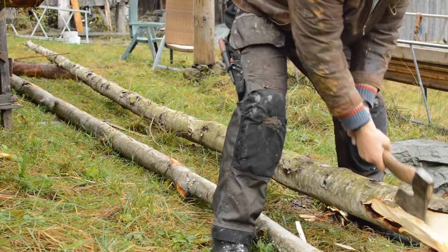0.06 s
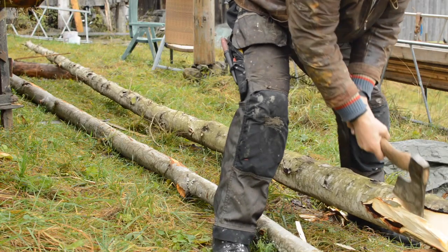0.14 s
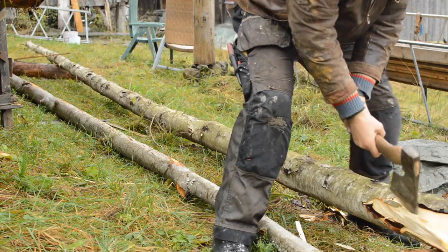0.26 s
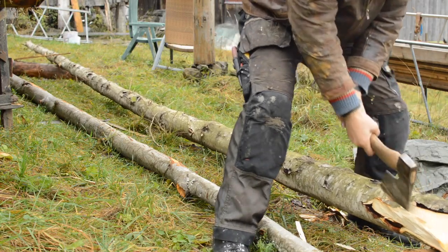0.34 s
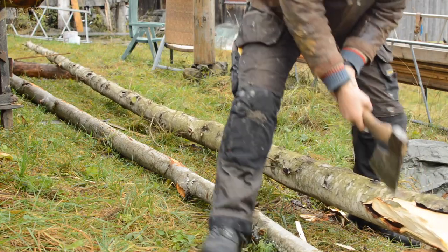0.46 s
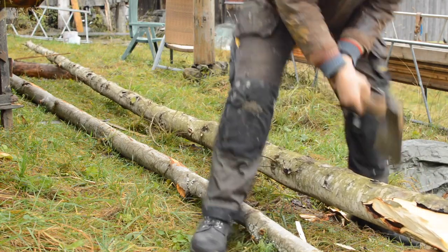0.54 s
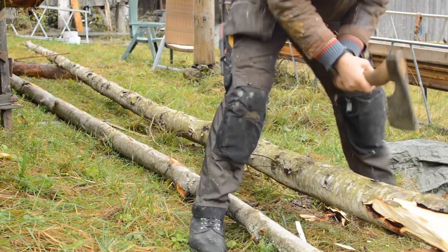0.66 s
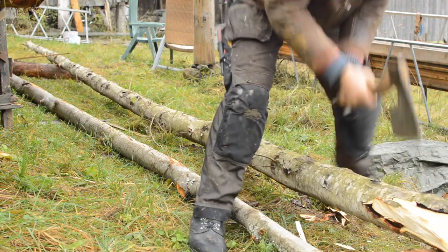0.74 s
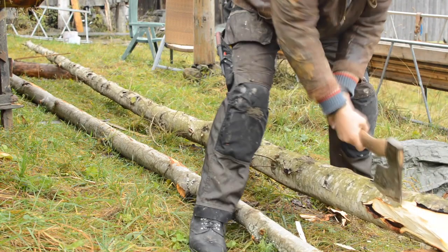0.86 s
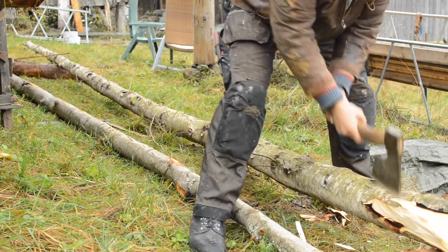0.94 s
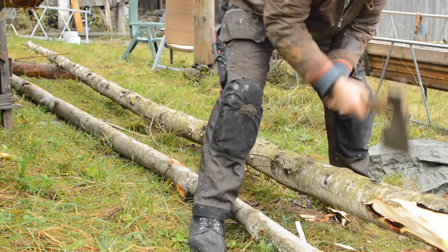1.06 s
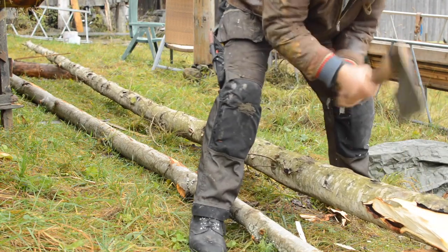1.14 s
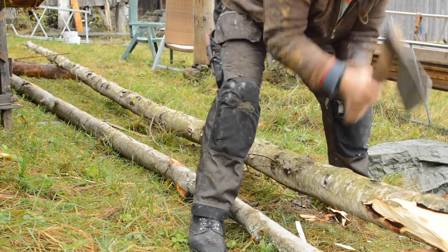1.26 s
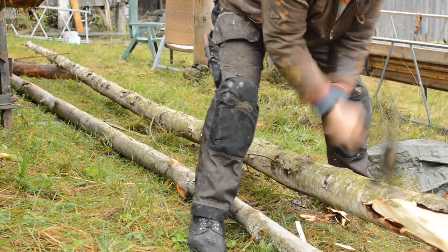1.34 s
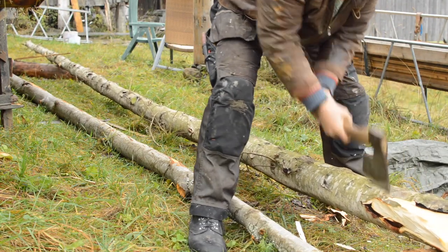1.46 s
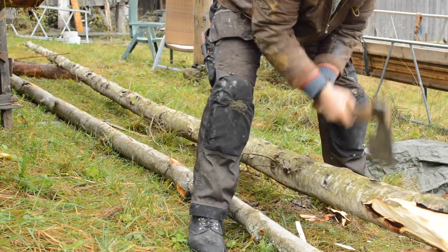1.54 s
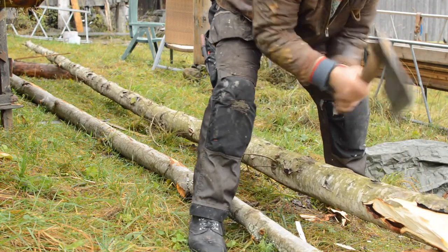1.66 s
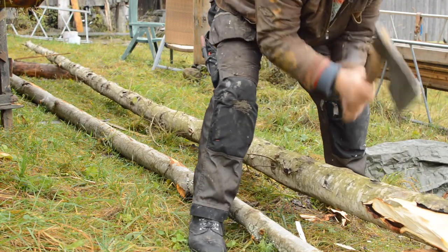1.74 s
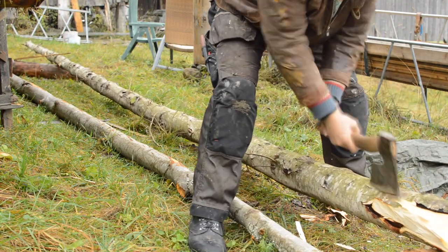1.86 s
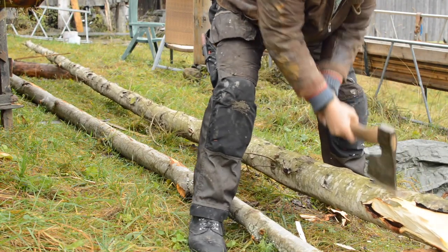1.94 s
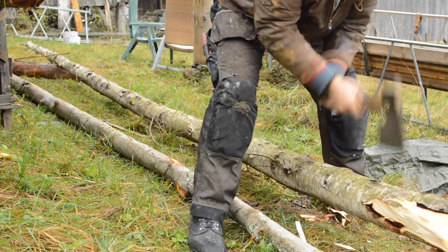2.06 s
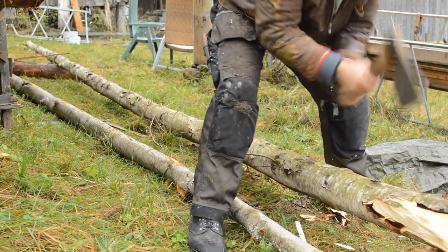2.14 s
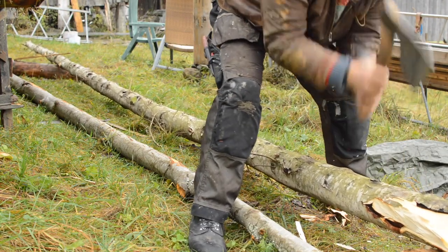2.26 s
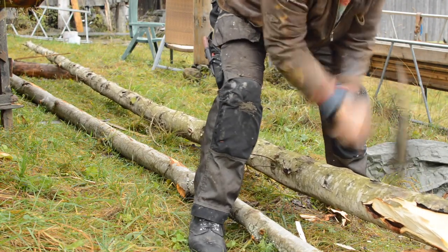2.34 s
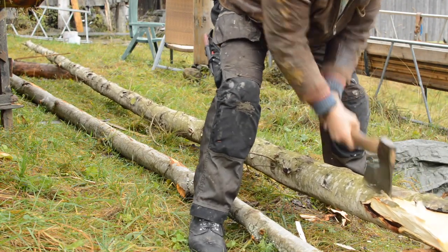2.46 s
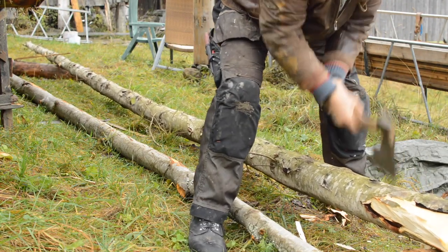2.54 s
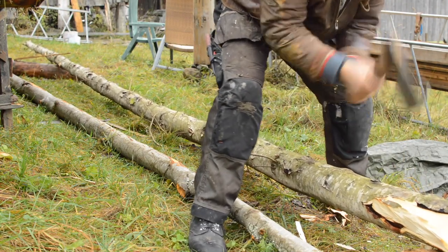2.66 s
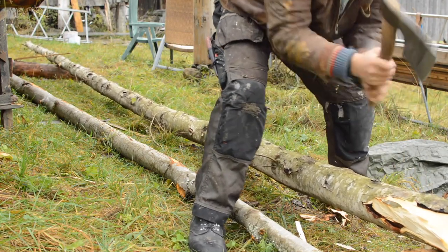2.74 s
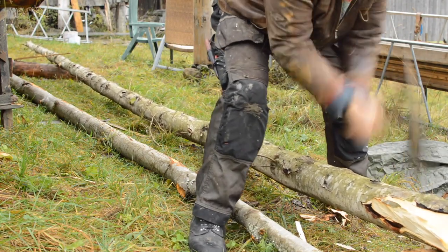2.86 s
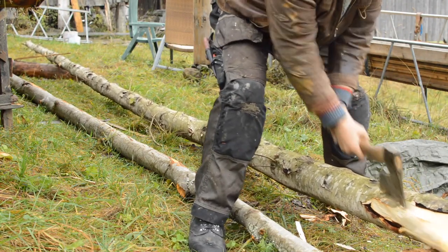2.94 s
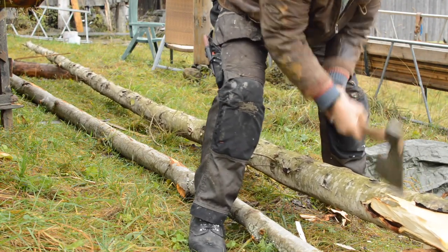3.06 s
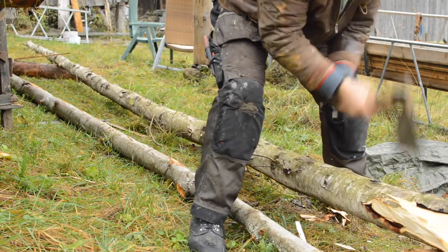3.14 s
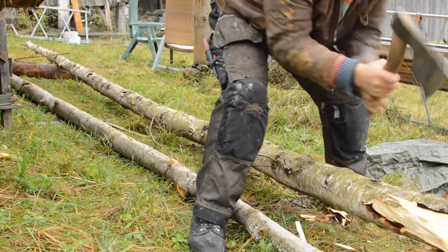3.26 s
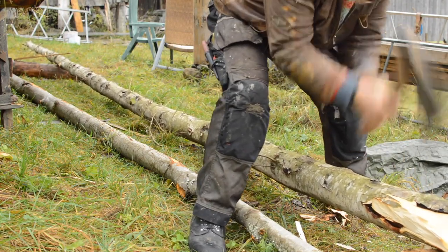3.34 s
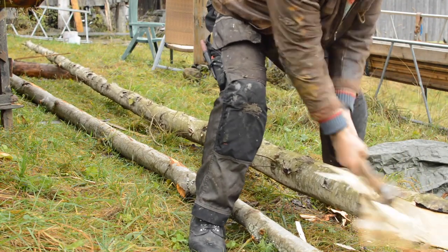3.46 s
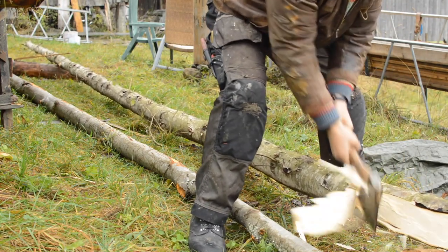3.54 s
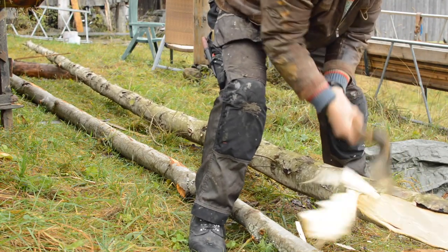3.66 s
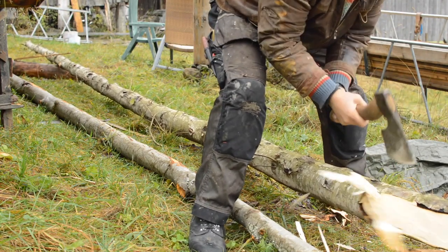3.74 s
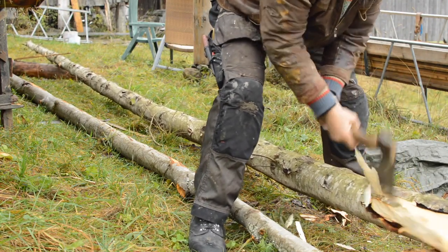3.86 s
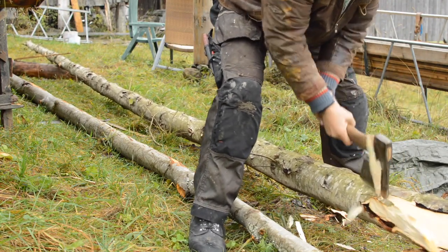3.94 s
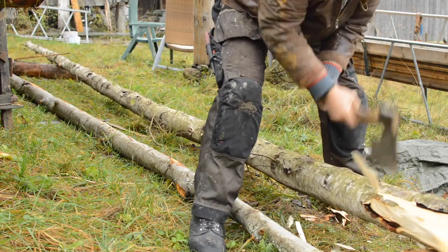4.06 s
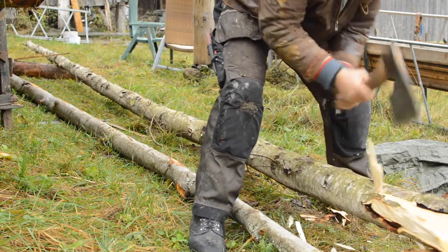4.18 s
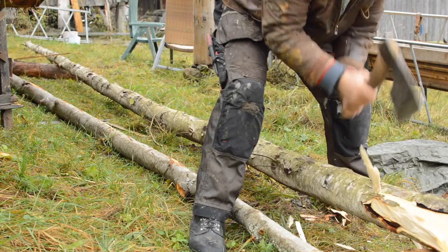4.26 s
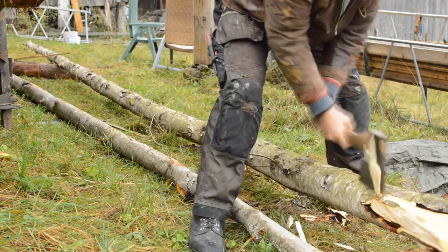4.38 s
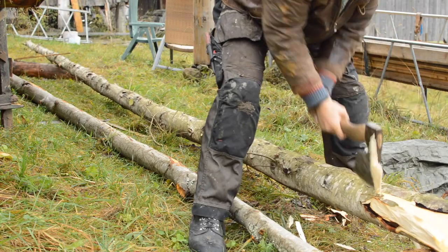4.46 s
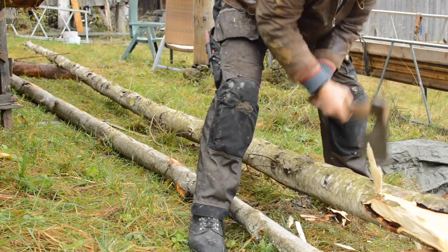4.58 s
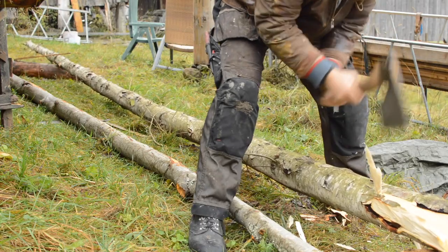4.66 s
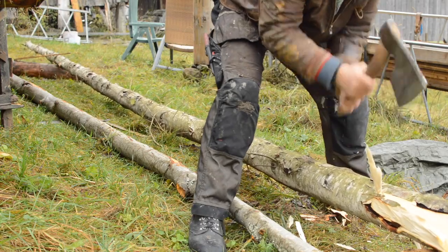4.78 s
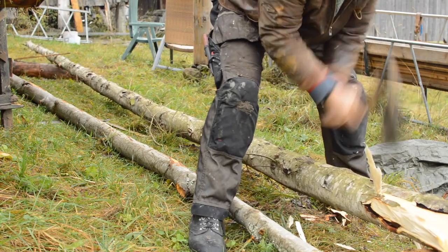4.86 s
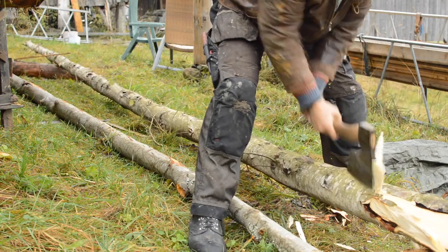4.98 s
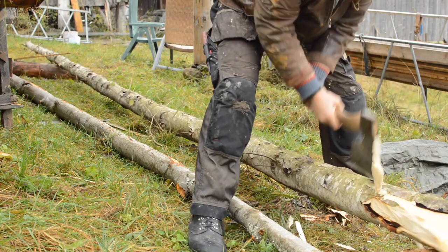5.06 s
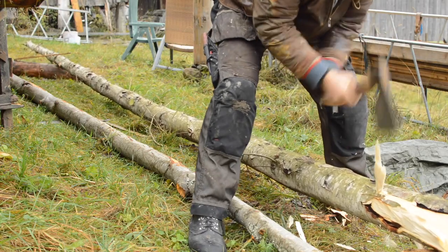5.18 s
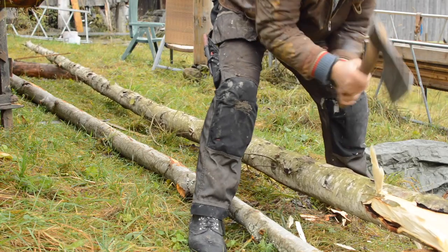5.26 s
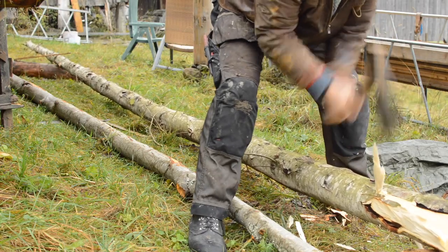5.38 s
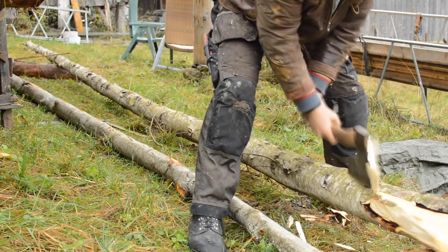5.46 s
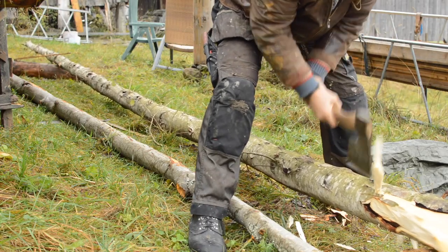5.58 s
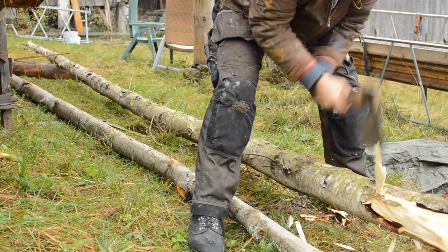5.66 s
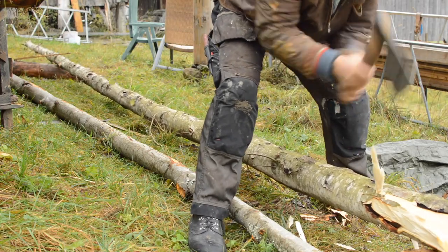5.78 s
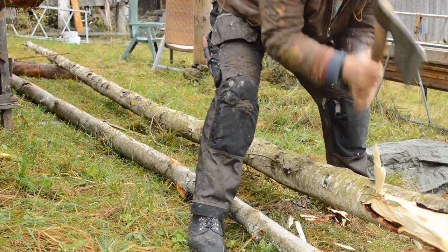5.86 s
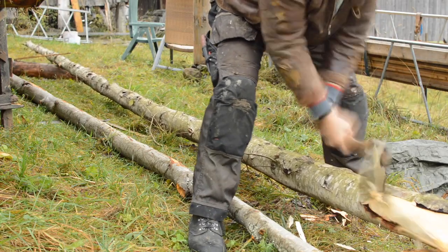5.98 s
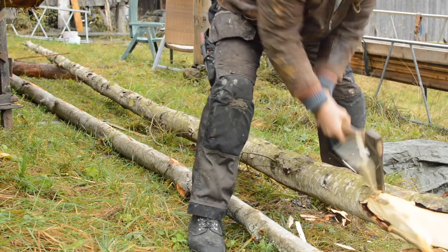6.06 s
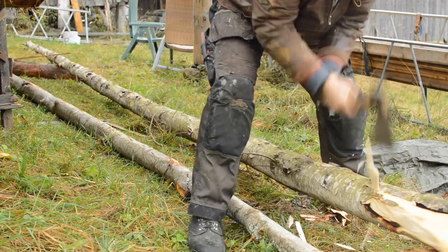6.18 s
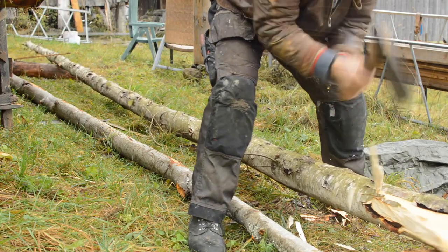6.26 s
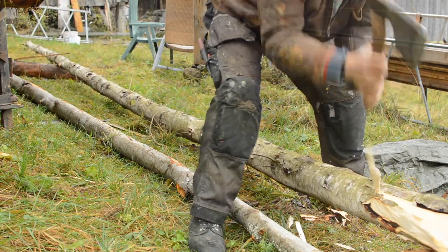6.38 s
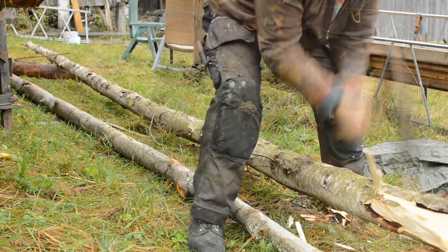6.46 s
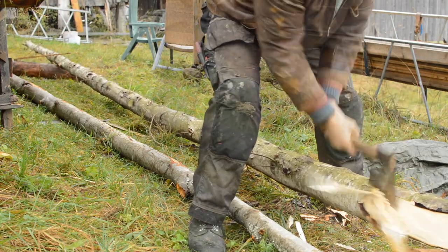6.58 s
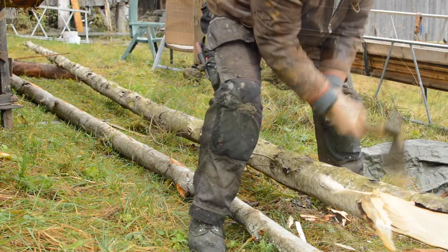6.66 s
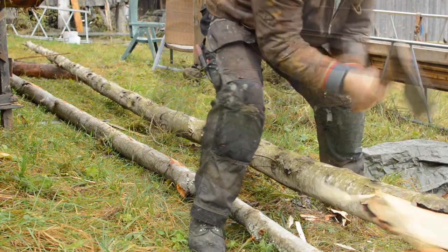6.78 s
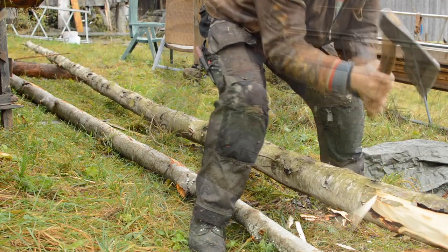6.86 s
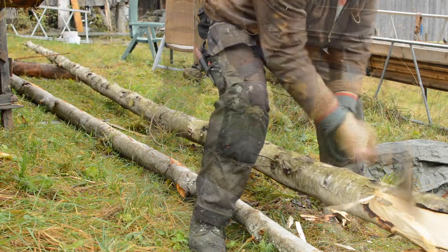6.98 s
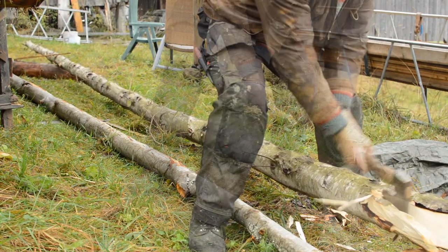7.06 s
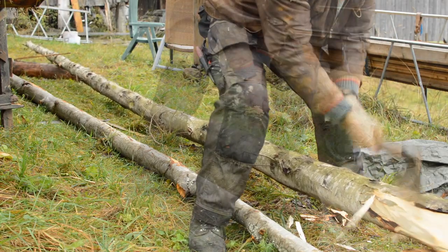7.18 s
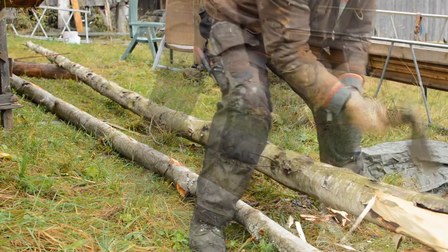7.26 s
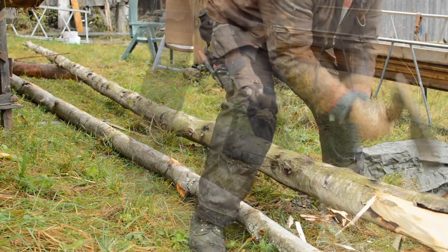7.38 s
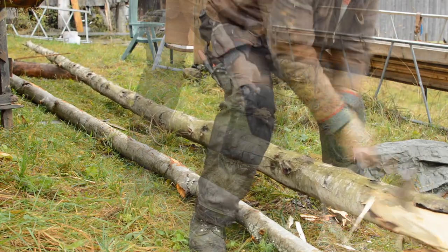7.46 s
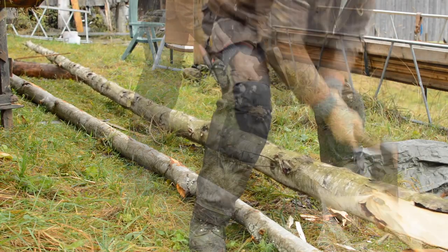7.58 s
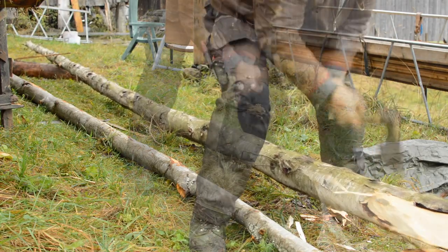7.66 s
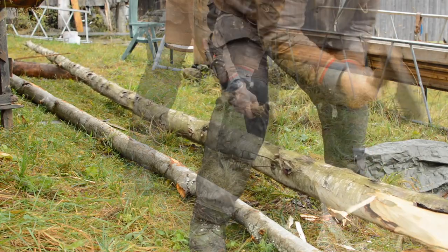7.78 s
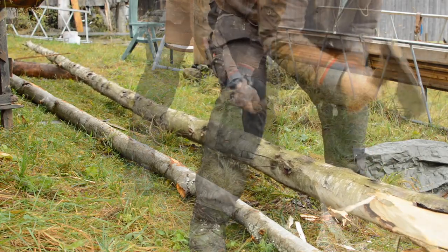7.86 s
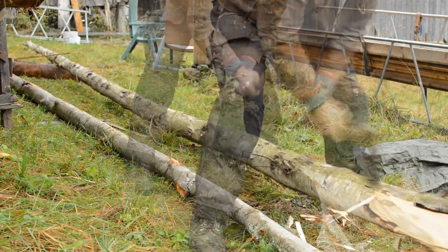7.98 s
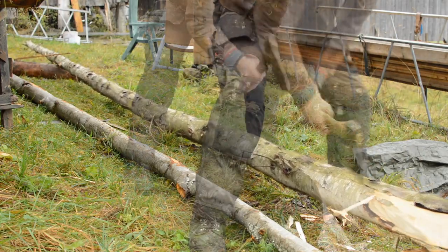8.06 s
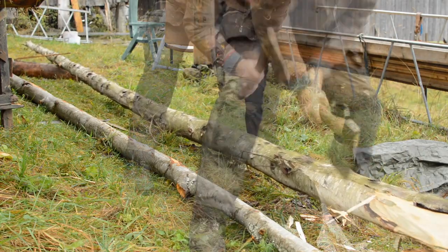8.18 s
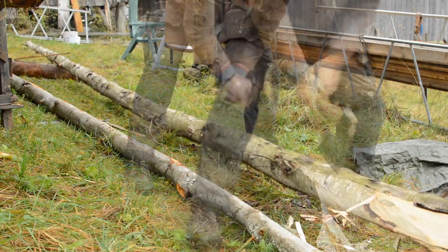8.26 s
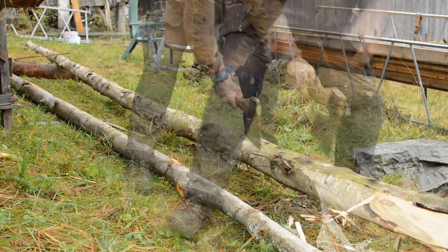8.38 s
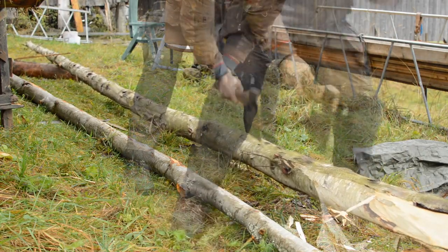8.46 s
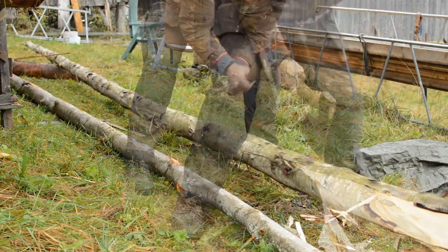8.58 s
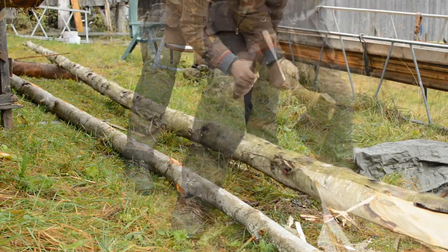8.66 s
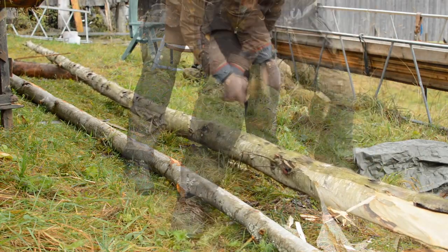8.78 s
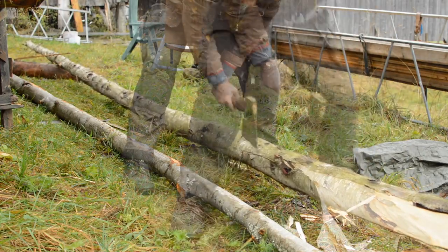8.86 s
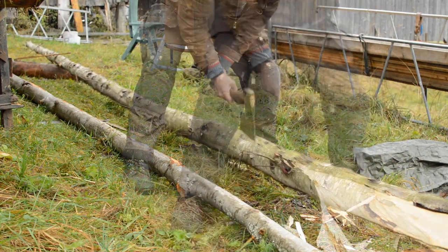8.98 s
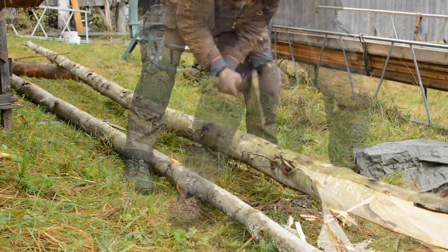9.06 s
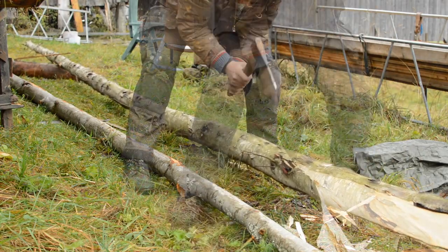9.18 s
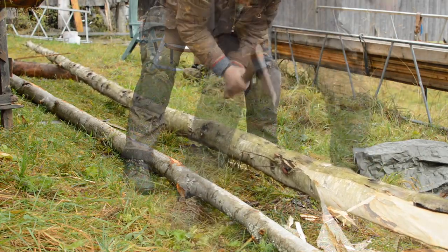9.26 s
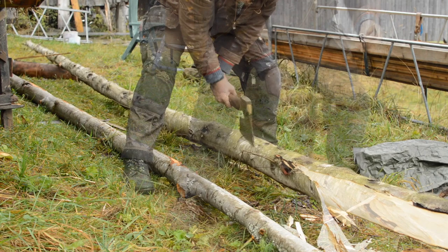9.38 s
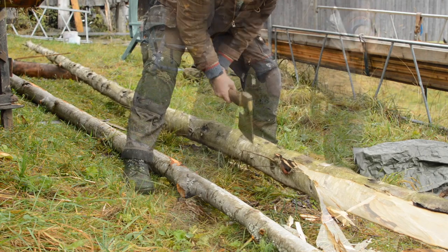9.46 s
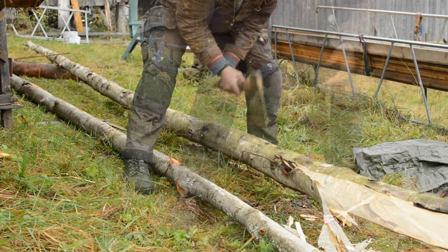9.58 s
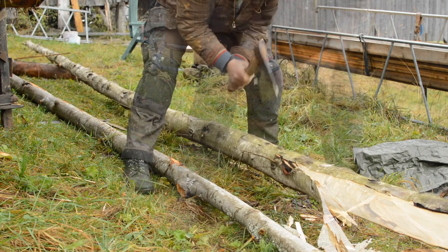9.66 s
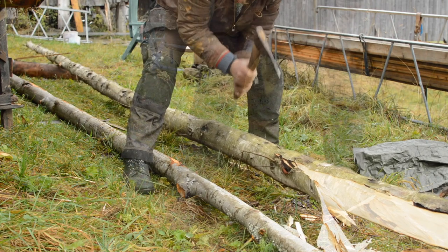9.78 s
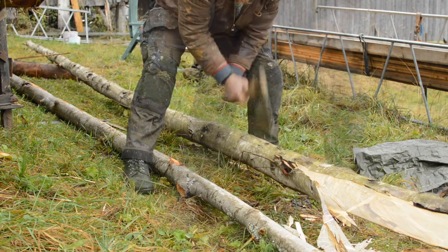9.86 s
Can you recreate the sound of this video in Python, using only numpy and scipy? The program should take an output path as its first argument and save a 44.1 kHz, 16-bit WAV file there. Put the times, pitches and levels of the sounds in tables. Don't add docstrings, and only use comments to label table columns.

```python
import sys
import numpy as np
from scipy import signal
from scipy.fft import rfft, irfft, next_fast_len
from scipy.io import wavfile
from scipy.ndimage import uniform_filter1d, map_coordinates

SR = 44100
rng = np.random.default_rng(int(sys.argv[2]) if len(sys.argv) > 2 else 0)


def store_pcm(level_fs):
    pcm = np.round(np.clip(level_fs, -1, 1) * 32767).astype(np.int16)
    wavfile.write(sys.argv[1], SR, np.atleast_2d(pcm).T)


def how_loud(loudness_db):
    steps = np.asarray(loudness_db, float) / 20
    return 10 ** steps


N = 437472

# (first contact [s], level [dB], split resonance [Hz], time until the chip parts [s],
# fibre hiss [dB])
BITES = [(0.9111, -12, 1410, 0.015, -10.5), (1.4209, -1.5, 1418, .0145, -12.5),
         (1.908, 3.5, 1484, .013, -16.5), (2.428, -0.5, 1290, .028, -8.5), (2.9596, 5.5, 1395, .0155, -16),
         (3.472, 4.5, 1498, 0.024, -12.5), (3.95, -10, 1391, 0.016, -10), (4.432, -3, 1305, .016, -11),
         (4.972, -3.5, 1349, .019, -8), (5.501, -1, 1414, .015, -14), (6.039, 2, 1481, .019, -11.5),
         (6.567, 6.5, 1497, .021, -14), (7.074, 2.5, 1205, 0.016, -11), (7.546, -9, 2136, .011, -10),
         (8.038, -12.5, 1315, .015, -5)]


def unit(x):
    return x / np.sqrt(np.mean(x ** 2) + 1e-20)


def along(points, hz):
    f, v = np.transpose(points)
    return np.interp(np.log(hz + 1), np.log(f + 1), v)


def curves(rows):
    s, *cols = np.transpose(rows)
    return [np.interp(np.arange(N) / SR, s, c) for c in cols]


def wobble(rate, size=N):
    knots = rng.standard_normal(int(size * rate / SR) + 4)
    return map_coordinates(knots, [np.arange(size) * rate / SR])


def bump(middle_s, spread_s):
    return np.exp(-((np.arange(N) / SR - middle_s) / spread_s) ** 2)


def filtered(x, response):
    m = next_fast_len(x.shape[-1] + 4096)
    spectrum = rfft(x, m) * response(np.fft.rfftfreq(m, 1 / SR))
    return irfft(spectrum, m)[..., :x.shape[-1]]


def resonance(centre_hz, width_hz):
    return lambda f: 1j * f * width_hz / (centre_hz ** 2 - f * f + 1j * f * width_hz)


def add(track, s, sound):
    part = track[max(round(s * SR), 0):][:len(sound)]
    part += sound[:len(part)]


def rush(spectrum, patchy_db):
    z = signal.stft(rng.standard_normal(N), nperseg=512)[2]
    field = uniform_filter1d(rng.standard_normal(z.shape), 6, 0)
    field = uniform_filter1d(field, 14, 1)
    noise = signal.istft(z * how_loud(patchy_db * unit(field)), nperseg=512)[1][:N]
    return unit(filtered(noise, lambda hz: how_loud(along(spectrum, hz))))


def engine():
    # (time [s], frequency [Hz], level [dB])
    firing = [(0.0, 94.84, -53), (0.77, 94.8, -48), (2.73, 94.87, -50.5), (2.96, 94.06, -46.5),
              (5.63, 91.84, -52), (7.4, 94.26, -48), (8.51, 94.9, -60), (8.84, 99, -54.5),
              (9.09, 98.3, -58), (9.28, 92.8, -54.5), (9.75, 90, -64), (9.92, 93.8, -55)]
    # (multiple of firing tone [1], level [dB], phase wander [rad])
    overtones = [(2.0, -17.5, 1.2), (2.45, -13.5, 2.4)]
    hum_hz, hum_db = curves(firing)
    turn = 2 * np.pi * np.cumsum(hum_hz) / SR
    sides = sum(how_loud(db + 1.5 * wobble(6)) * np.sin(k * turn + wander * wobble(6))
                for k, db, wander in overtones)
    return how_loud(hum_db + 4.0) * (how_loud(1.3 * wobble(13)) * np.sin(turn) + sides)


def whine():
    # (time [s], frequency [Hz], level [dB])
    drift = [(.1, 776.2, -66), (.62, 775.2, -53), (1.5, 772, -52.5), (1.8, 777, -69), (2.5, 780, -57.5),
             (2.95, 781, -52), (3.2, 778.3, -67.5), (4.2, 784.5, -53), (4.55, 800, -82), (4.7, 808, -55.5),
             (5.0, 810, -52.5), (5.5, 804.3, -84.5), (6.0, 787.7, -54.5), (6.8, 797, -57), (7.1, 800, -68),
             (7.3, 810, -51.5), (8.8, 810, -59.5), (9.92, 816, -73)]
    hz, db = curves(drift)
    return how_loud(db + 1 + 1.6 * wobble(20)) * np.sin(2 * np.pi * np.cumsum(hz) / SR)


def mains():
    # (frequency [Hz], level [dB rms], phase wander [rad])
    tones = [(61, -57, .3), (119.6, -64, 1.2)]
    turn = 2 * np.pi * np.arange(N) / SR
    return sum(how_loud(db + 2 + 1.6 * wobble(4.2)) * np.sin(hz * turn + wander * wobble(2.7))
               for hz, db, wander in tones)


def air():
    # (frequency [Hz], density [dB per Hz])
    low = [(18, -30), (45, -13), (107, -10.5), (156, -19), (200, -14), (290, -19.5), (1040, -31),
           (1760, -120)]
    middle = [(350, -48), (600, -13.5), (791, -8), (1190, -6), (3000, -16.5), (3900, -50.5), (6600, -120)]
    high = [(1470, -33), (2500, -11.5), (3280, -4), (4110, -5), (6860, -6.5), (10700, -9.5), (15000, -9.5),
            (16000, -15.5)]
    # (time [s], level [dB])
    nearness = [(0, -1.5), (2.3, -1), (4.5, -1.5), (6.8, -1.5), (7.4, -3.5), (8.6, -5.5), (9.92, -4.5)]
    # (middle [s], rise [dB], spread [s])
    showers = [
        (.65, 5.5, .2),
        (3.599, 6.5, 0.057),
        (4.0, 2.5, 0.16),
        (6.19, 2.5, .15),
        (6.65, 11, 0.074),
        (6.88, 3.5, 0.077),
    ]
    near_db, = curves(nearness)
    rumble_db = -57.5 + near_db + 1.0 * wobble(3.3)
    drone_db = -57.5 + near_db
    crumbs_db = sum(db * bump(s, spread) for s, db, spread in showers)
    dip_lead_s, dip_spread_s, dip_db = 0.16, 0.18, -0.5
    dips_db = sum(dip_db * bump(row[0] - dip_lead_s, dip_spread_s) for row in BITES)
    rustle_db = -63.5 + 0.89 * near_db + crumbs_db + dips_db
    grains = unit(how_loud(0.8 * wobble(89) + 1.1 * wobble(500)) * rush(high, patchy_db=0.6))
    rumble = how_loud(rumble_db + 7.5) * rush(low, patchy_db=0.57)
    drone = how_loud(drone_db + 1.5) * rush(middle, patchy_db=1.47)
    return rumble + drone + how_loud(rustle_db + 4.5) * grains


def axe(bites, crackle_db, entry, knee):
    # (frequency [Hz], level [dB])
    fibres = [(700, -22), (2000, 6), (3000, 1.5), (4500, 1), (6500, 0), (9000, -2), (13000, -8.5),
              (16000, -13.5)]
    glide, glide_share, split_width_hz = 0.59, 0.13, 587
    part_t60_s, creep_t60_s = 0.021, 0.067
    out, t = np.zeros(N), np.arange(SR // 5) / SR
    for s, db, split_hz, length, hiss_db in bites:
        depth = t / max(length, 0.002)
        after = np.maximum(t - length, 0)
        force = np.tanh((np.minimum(depth, 1) / knee) ** entry)
        effort = force * how_loud(-60 * after / part_t60_s)
        creep = force * how_loud(-13 - 60 * after / creep_t60_s)
        snaps = np.array([unit(how_loud(crackle_db * wobble(700, size=len(t)))) * rng.standard_normal(len(t))
                          for layer in range(4)])

        turn = 2 * np.pi * split_hz * np.cumsum(1 + glide * np.exp(-depth / glide_share)) / SR
        slow = filtered(snaps[:2], lambda hz: 1 / (1 + 2j * hz / split_width_hz) ** 2)
        split = effort * (slow[0] * np.cos(turn) + slow[1] * np.sin(turn))
        split = unit(split) * np.sqrt(np.mean(effort ** 2))

        splinters = np.c_[np.geomspace(1800, 16000, num=16), 2 * rng.standard_normal(16)]
        hiss = unit(filtered(snaps[2], lambda hz: how_loud(along(fibres, hz) + along(splinters, hz))))
        hiss = how_loud(hiss_db - 2.5) * (effort + how_loud(-6.5) * creep) * hiss
        broad = unit(filtered(snaps[3], resonance(1900, 2600)))
        add(out, s, how_loud(db) * (how_loud(-14.5) * split + how_loud(-11) * creep * broad + hiss))
    return out


def log_ring(knocks, modes, return_s, ring_db):
    thud_level_db, thud_grows = -19, 0.55
    out, t = np.zeros(N), np.arange(SR // 3) / SR
    swell = 1 - np.exp(-(t / 0.028) ** 2)
    push = t / 0.016 * np.exp(1 - (t / 0.011) ** 2)
    ground = how_loud(-23.0) * np.sin(2 * np.pi * 42 * t) * t / 0.018 * np.exp(1 - t / 0.01)
    for s, db, low_db, high_db in knocks:
        thud_db = thud_level_db + (thud_grows - 1) * db
        colour = [(170, low_db), (350, 0.0036), (620, high_db)]
        chance = rng.standard_normal((len(modes), 2))
        rocking = 3 * np.sin(2 * np.pi * (13 + 3 * chance[:, :1]) * t + 9 * chance[:, 1:])
        ring = np.zeros(len(t))
        for (hz, level, t60), (u, v), rock in zip(modes, chance, rocking):
            decay = how_loud(level + 2.5 * u + rock - 60 * t / (0.77 * t60))
            ring += decay * np.cos(2 * np.pi * hz * (1 + 0.0076 * u) * (t - return_s) + 0.75 * v)
        turf = unit(filtered(rng.standard_normal(len(t)), lambda hz: resonance(340, 420)(hz) ** 2))
        rattle = how_loud(-3 - 60 * t / 0.14) * swell
        body = how_loud(ring_db) * swell * ring + turf * (how_loud(thud_db) * push + rattle)
        add(out, s, how_loud(db) * (filtered(body, lambda hz: how_loud(along(colour, hz))) + ground))
    return out


def chips():
    # (time [s], peak level [dB], centre [Hz])
    slab_snaps = [(0.029, -12, 2980), (.0312, -4.5, 2376), (0.032, -7, 3565), (.051, -1, 6420),
                  (0.0607, -11, 4500), (.0655, -9.5, 8490), (0.069, -10.5, 8920), (.105, -26, 5600),
                  (0.3454, -16, 1690), (.3478, -15.5, 1760), (.352, -12, 1757), (0.3626, -21, 12750),
                  (0.3745, -26, 1600), (0.388, -22, 4150), (.3952, -18, 6435), (.398, -19, 13290),
                  (0.402, -12.5, 4250), (.402, -20.5, 1480), (.441, -37, 1700), (0.5299, -32.5, 4500),
                  (2.455, -7, 7900), (3.501, -4.5, 4287), (3.5025, -2.5, 6555), (3.5143, 0, 6486),
                  (3.53, -16, 6510), (3.5395, -21, 5980), (3.599, -32, 5984), (3.624, -30, 7450),
                  (3.7001, -37.5, 5340), (3.706, -37.5, 2480), (3.901, -24, 3940), (3.9076, -17, 3690),
                  (3.9127, -15, 2708), (3.9155, -21, 13040), (3.9246, -19.5, 6500), (3.9473, -31.5, 11980),
                  (5.5573, -33, 7496), (6.587, -4.5, 9140), (1.4338, -7, 1660), (2.4477, -1.5, 6000),
                  (7.08, -5, 8000), (7.5314, -13.5, 8000), (7.5521, -12, 2190), (7.553, -6.5, 3246),
                  (7.6, -37, 3330), (7.605, -28, 7190), (8.051, -5.5, 8000)]
    # (time [s], peak level [dB], centre [Hz])
    landings = [(0.1012, -28, 2876), (0.102, -26.5, 9040), (0.1203, -29.5, 10020), (.4398, -34, 4800),
                (0.5295, -32.5, 1570), (0.5867, -35, 8030), (0.7012, -33.5, 2140), (.7015, -40, 7000),
                (0.751, -37.5, 2150), (0.7583, -31, 6360), (1.9839, -35, 2007), (2.5117, -29, 2500),
                (2.592, -33.5, 1477), (3.1053, -34, 1715), (3.5691, -25.5, 10950), (3.6051, -11.5, 7210),
                (3.6248, -22.5, 5000), (3.8847, -37, 1555), (4.0544, -41, 1525), (4.5094, -40, 1530),
                (5.0583, -18, 6870), (5.1814, -44, 1500), (6.1047, -34, 1700), (6.123, -29, 2436),
                (6.141, -28, 6510), (6.18, -41, 7000), (6.1382, -25, 5980), (6.6473, -24.5, 2165),
                (6.8449, -30, 5990), (6.901, -38, 7960), (6.929, -30.5, 3100), (6.929, -33, 7500),
                (7.0167, -42, 1814), (7.3914, -41.5, 2580), (7.6045, -25, 2275),
                (3.775, -42.5, 7500),
        (4.161, -39, 12000),
        (4.191, -39.5, 5990),
        (5.072, -29, 7060),
        (5.143, -35.5, 8000),
        (5.37, -45, 7000),
        (6.235, -40, 6000),
        (6.25, -41.5, 13040),
        (6.662, -25, 10990),
    ]
    # (frequency [Hz], t60 [s])
    tick_t60 = [(1500, 0.015), (8000, 0.0034)]
    click_db, click_t60_s, onset_s = -3.5, 0.0039, 0.0003
    out, t = np.zeros(N), np.arange(SR // 20) / SR
    start = 1 - np.exp(-t / onset_s)
    for s, db, hz in slab_snaps + landings:
        noise = start * rng.standard_normal((2, len(t)))
        tick = how_loud(-60 * t / max(along(tick_t60, hz), 0.003)) * noise[0]
        tick = tick + 4.2 * (t == 1 / SR)
        click = np.diff(how_loud(click_db - 60 * t / click_t60_s) * noise[1], prepend=0)
        tick = filtered(tick, lambda f: resonance(hz, 0.75 * hz)(f) ** 2) + how_loud(-15.5) * click
        add(out, s - onset_s, how_loud(db) * tick / np.abs(tick).max())
    return out


def yard(x):
    # (frequency [Hz], t60 [s])
    echo_t60 = [(150, 0.61), (600, 0.17), (2000, .25), (6000, 0.093), (14000, 0.17)]
    hz, t, z = signal.stft(rng.standard_normal(SR // 2), SR, nperseg=256)
    fading = z * how_loud(-60 * t / along(echo_t60, hz)[:, None])
    tail = signal.istft(fading, SR, nperseg=256)[1]
    delayed = np.pad(x, (700, 0))
    return signal.fftconvolve(delayed, tail / np.linalg.norm(tail))[:N]


def steel():
    # (time [s], level [dB], frequency [Hz], t60 [s])
    tones = [(.215, -60, 4170, .4), (.4, -46, 4170, 0.34), (1.439, -46, 4180, 0.29),
             (8.122, -50, 1800, .05), (8.19, -47, 1830, .05), (7.56, -50, 4120, 0.37),
             (8.11, -47, 4450, 0.11), (8.122, -44, 2740, 0.1), (8.186, -47, 2730, 0.085),
             (8.38, -48, 4200, 0.33), (8.901, -52, 4172, 0.52), (9.426, -52, 4180, 0.56)]
    out, t = np.zeros(N), np.arange(SR // 2) / SR
    for s, db, hz, t60 in tones:
        decay = how_loud(db - 60 * t / t60 + 1.8 * wobble(90, size=len(t)))
        add(out, s, decay * (1 - np.exp(-t / 0.002)) * np.sin(2 * np.pi * hz * t))
    return out


def scuffs(strokes, width, order):
    out, t = np.zeros(N), np.arange(SR // 5) / SR - 0.1
    for s, db, hz, length in strokes:
        grit = how_loud(1.2 * wobble(400, size=len(t))) * rng.standard_normal(len(t))
        rub = unit(filtered(grit, lambda f: resonance(hz, width * hz)(f) ** 2))
        add(out, s - 0.1, how_loud(db) * np.exp(-(2 * t / length) ** order) * rub)
    return out


def scene():
    # (first contact [s], level [dB],
    # split resonance [Hz], time until the chip parts [s], fibre hiss [dB])
    tears = [
        (.0172, -18, 900, 0.0062, -19.5),
        (.022, -7.5, 1650, .016, -12.5),
        (.043, -9, 1504, .019, -9),
        (.327, -23.5, 1490, 0.011, -17),
        (.337, -14.5, 1610, .018, -16),
        (.355, -16.5, 1604, 0.011, -13.5),
        (.383, -23, 1630, 0.016, -8),
        (3.498, -7, 1537, 0.014, -8.5),
        (3.905, -16.5, 1676, .013, -12),
        (7.523, -11.5, 1093, 0.024, -15),
    ]
    far_bites = [
        (7.825, -20.5, 1224, .011, -12.5),
        (8.3655, -18.5, 1066, .018, -6),
        (8.895, -11.5, 1083, .015, -12),
        (9.419, -10.5, 1049, .014, -13),
    ]
    # (time [s], ring level [dB], change of low modes [dB], change
    # of high modes [dB])
    knocks = [(.02, -11.5, 2.5, -10.5), (.047, -30.5, -2, 10.5), (.34, -31, 2.5, -10), (.912, -14, 5, -0.5),
              (1.421, -6.5, -6, -2), (1.908, -10, 8, 3), (2.432, -9, 0, 0.5), (2.961, -17.5, 6.5, 9.5),
              (3.475, -14, 5, 6.5), (3.9, -34, 9, -8), (3.949, -9.5, 0.5, -5), (4.433, -14, 6, 2.5),
              (4.971, -6, 0.5, -2), (5.5, -9.5, 6.5, -0.5), (6.041, -14, 7.5, 5), (6.568, -2, -5, -2),
              (7.073, -10.5, 4, 3.5), (7.523, -20, 6, -3), (7.548, -19.5, 8.5, 7), (8.039, -19, 6.5, 5.5)]
    far_knocks = [
        (7.828, -23.5, 0.094, 0.09),
        (8.366, -18.5, .1, 0.096),
        (8.895, -15.5, 0.11, .1),
        (9.42, -14, 0.12, .1),
    ]
    # (frequency [Hz], level [dB], t60 [s])
    near_modes = [(144.8, -23.5, 0.49), (193, -18, 0.31), (289.5, -2.5, 0.28), (350.6, -3.5, 0.21),
                  (397.7, -7, 0.33), (447, -6, 0.3), (504.8, -2.5, 0.24), (585.2, -5, 0.21),
                  (637, -4.5, 0.2), (721, -11.5, 0.2), (844, -9, 0.067)]
    far_modes = [(197, -6, 0.28), (261, 2, 0.216), (375, -14, 0.24), (402.6, -8.5, 0.263), (440, 0, 0.26),
                 (484, 0, 0.14), (670, -8, 0.27), (677, -7.5, 0.12), (702, -3, 0.21), (750, -35, 0.52)]
    # (middle [s], level [dB rms],
    # centre [Hz], length [s])
    slides = [(3.502, -8.5, 5000, 0.0045), (3.6045, -31, 13000, 0.0034), (6.205, -49.5, 3960, .02),
              (.345, -36.5, 5030, 0.018), (2.515, -43, 2500, .015), (3.04, -44.5, 4960, .015),
              (0.374, -42, 4997, 0.042), (5.545, -35.5, 3500, .012), (8.127, -47, 8940, .01),
              (0.606, -52, 2922, 0.04), (0.615, -49.5, 8700, 0.051), (.655, -47, 5880, .03),
              (3.618, -46.5, 5000, 0.035), (3.709, -47.5, 2840, .02), (3.903, -48.5, 4970, 0.047),
              (6.129, -41.5, 4000, 0.036), (6.741, -33, 2000, .025), (6.743, -39.5, 6120, 0.013),
              (6.867, -48, 3860, 0.016), (7.192, -44.5, 2400, 0.016), (8.49, -50.5, 7020, 0.069)]
    # (middle [s], level [dB rms], centre [Hz], length [s])
    edges = [(.391, -27.5, 4130, 0.013), (1.914, -18.5, 3100, 0.0028), (2.439, -14.5, 2920, .01),
             (3.955, -29, 2960, 0.0072), (5.505, -26.5, 3040, 0.0061), (6.046, -11.5, 2830, 0.0088),
             (6.571, -14.5, 3000, 0.0043), (7.078, -18.5, 3050, 0.0056), (7.538, -27, 2770, .02),
             (8.37, -24.5, 2750, 0.0094), (8.898, -27, 2710, .008), (9.422, -24, 2690, 0.0083)]

    near = axe(BITES, crackle_db=2.2, entry=1.3, knee=0.51)
    near = near + axe(tears, crackle_db=3, entry=0.63, knee=0.45)
    near = near + log_ring(knocks, near_modes, return_s=0.036, ring_db=-4.5)
    far = axe(far_bites, crackle_db=2.2, entry=0.6, knee=0.28)
    far = far + log_ring(far_knocks, far_modes, return_s=0.028, ring_db=-6.5)
    rubbing = scuffs(slides, width=1.7, order=2) + scuffs(edges, width=0.25, order=4)
    work = near + far + chips() + rubbing + steel()
    mono = work + how_loud(-21) * yard(work) + engine() + whine() + mains() + air()
    return np.array([mono, mono])


def roll_off(x):
    return signal.sosfilt(signal.butter(12, 16960, fs=SR, output="sos"), x)


def record(dry):
    # (frequency [Hz], density [dB per Hz])
    apart_spectrum = [(35, -45), (60, -14.5), (91, -12.5), (376, -1.5), (976, -6), (1350, -9), (3340, -5.5),
                      (15500, -5)]
    level = dry / (1 + np.abs(dry / 0.86) ** 4) ** (1 / 4)
    loudness = np.abs(uniform_filter1d(level[0] ** 2, size=1500))
    apart = how_loud(-64.5) * rush(apart_spectrum, patchy_db=3.0) / (1 + (loudness / how_loud(-63.5)) ** 2)
    top_hz = 15800
    mix = filtered(level + np.array([apart, -apart]), lambda hz: np.where(hz < top_hz, 1, how_loud(-40.5)))
    return roll_off(mix)


dry = scene()
out = record(dry)
store_pcm(out)
```